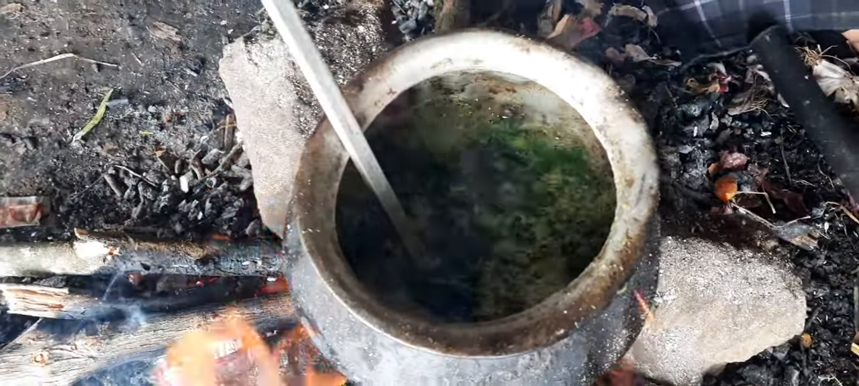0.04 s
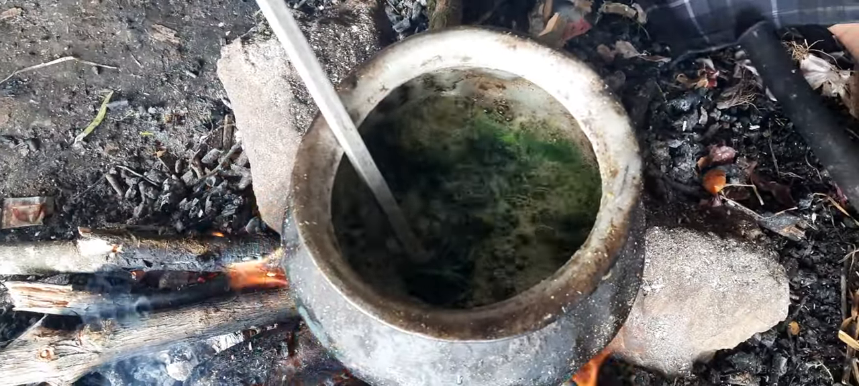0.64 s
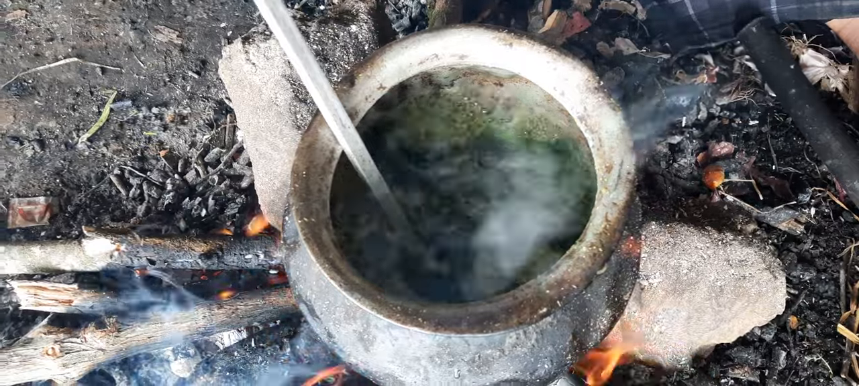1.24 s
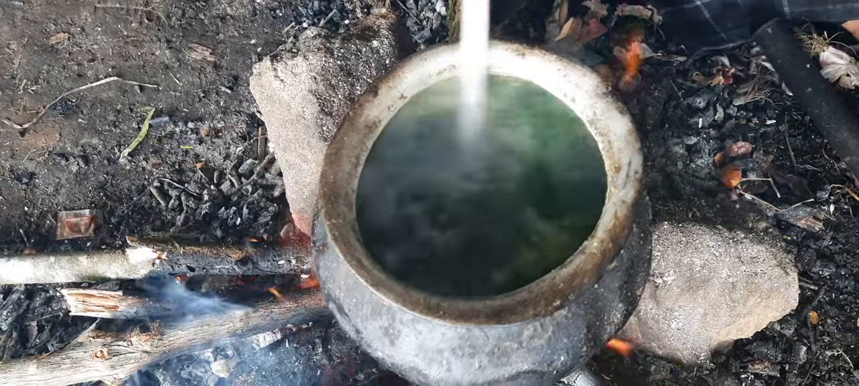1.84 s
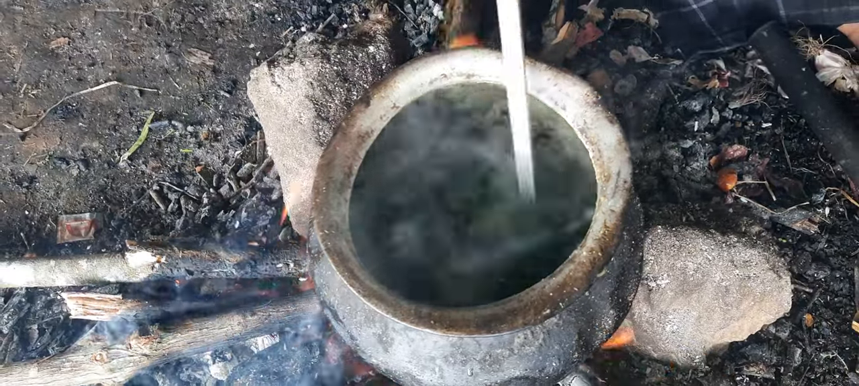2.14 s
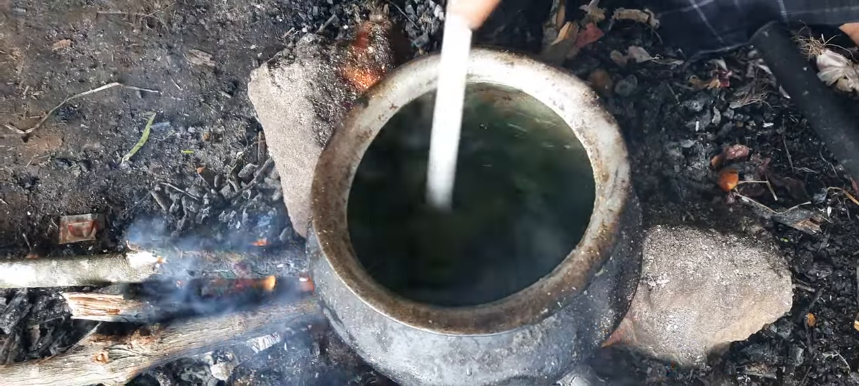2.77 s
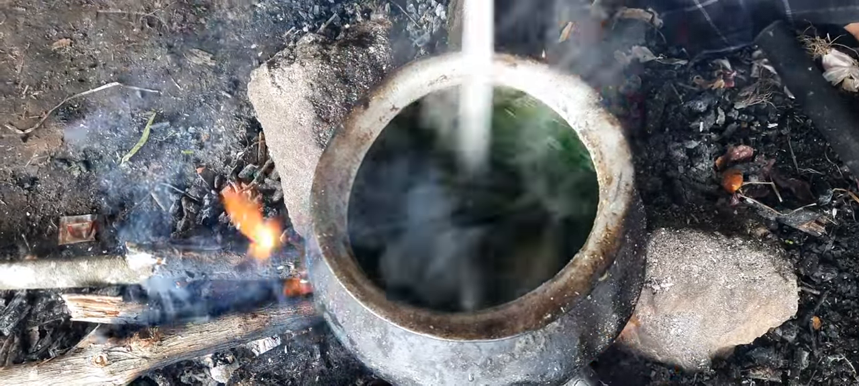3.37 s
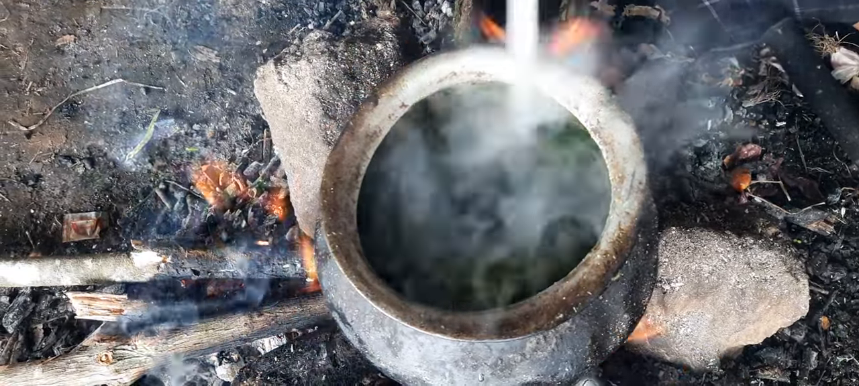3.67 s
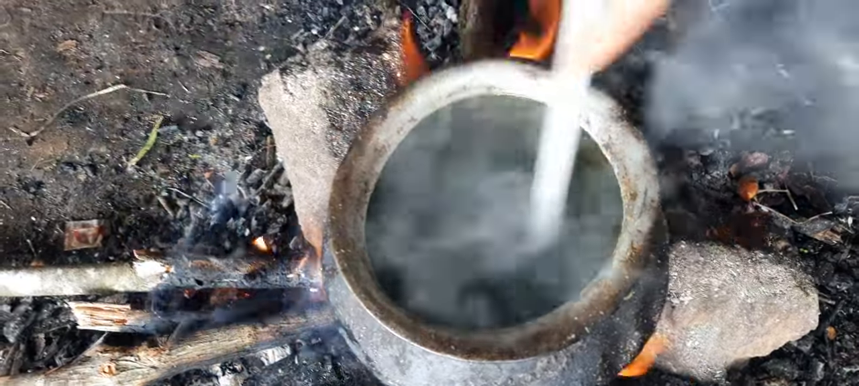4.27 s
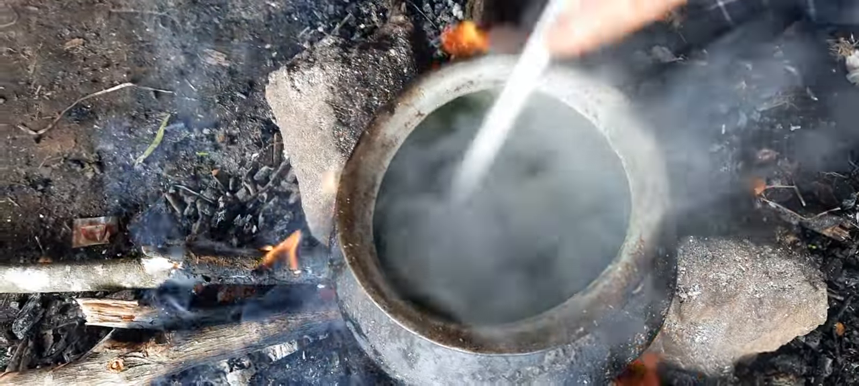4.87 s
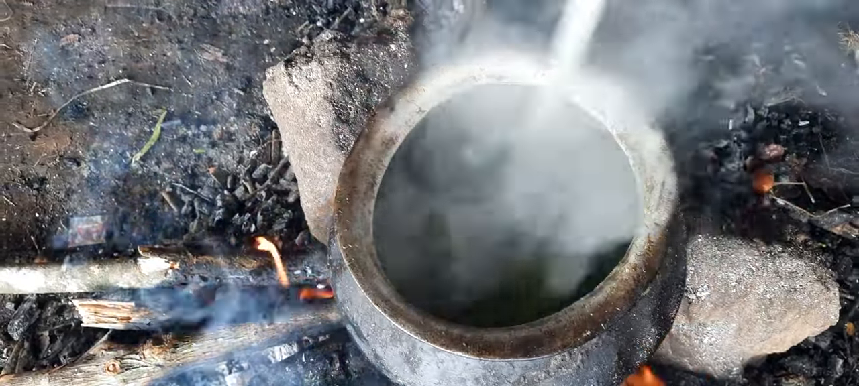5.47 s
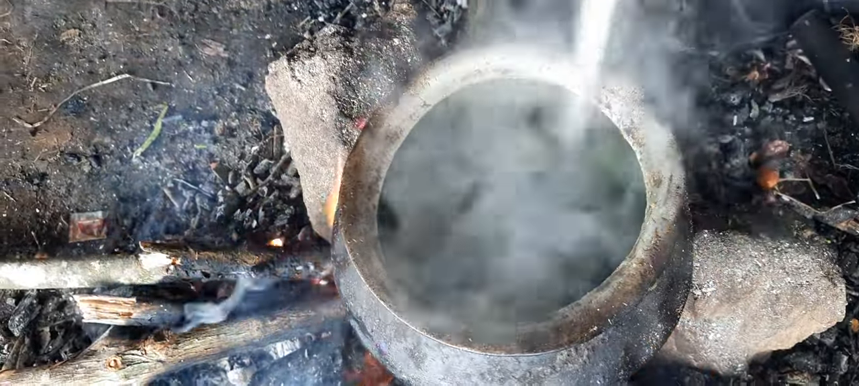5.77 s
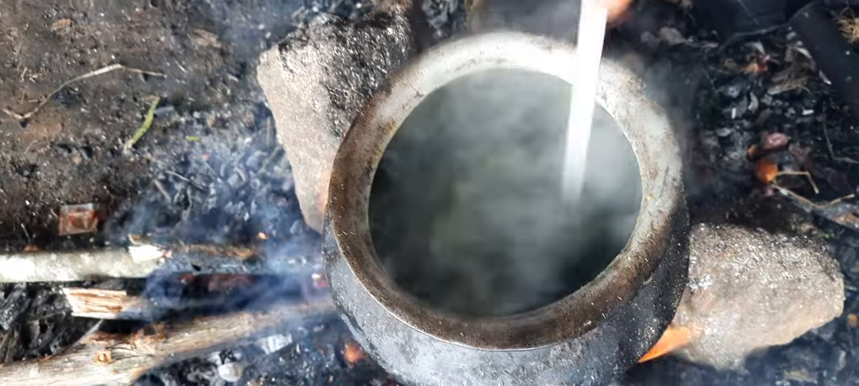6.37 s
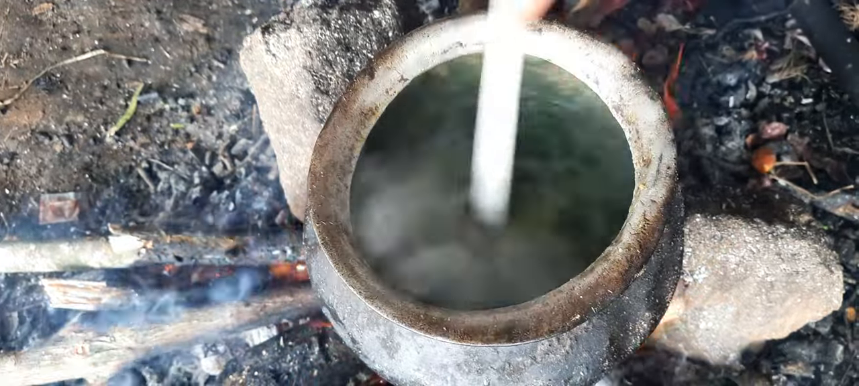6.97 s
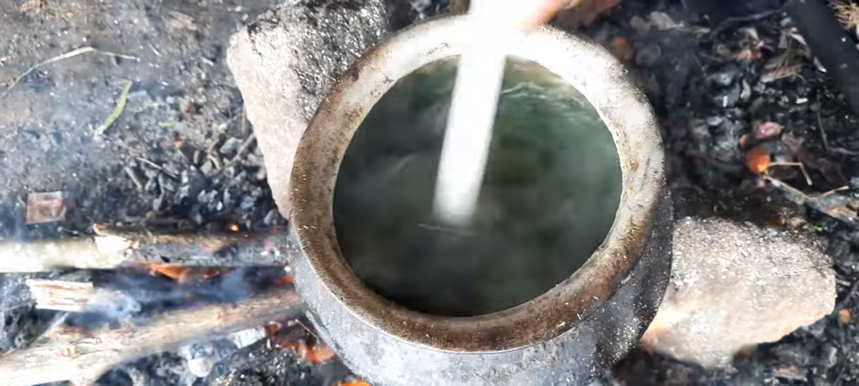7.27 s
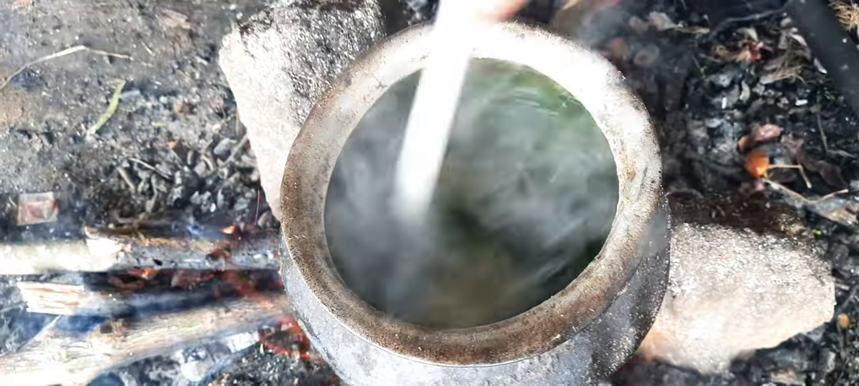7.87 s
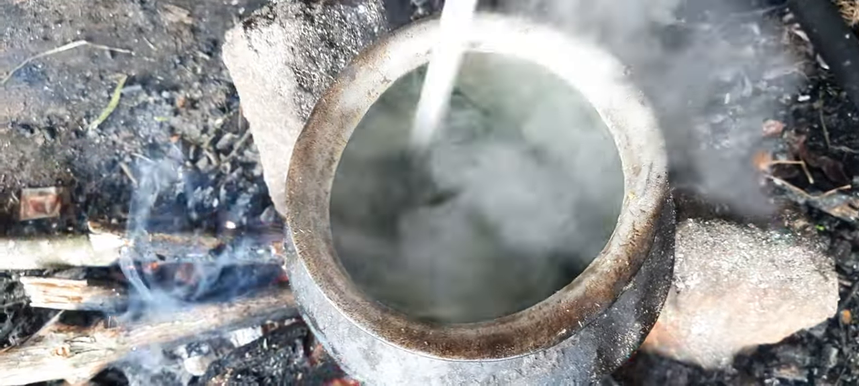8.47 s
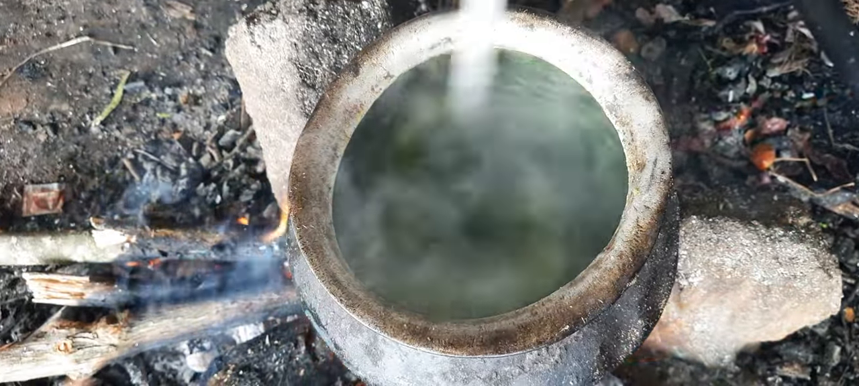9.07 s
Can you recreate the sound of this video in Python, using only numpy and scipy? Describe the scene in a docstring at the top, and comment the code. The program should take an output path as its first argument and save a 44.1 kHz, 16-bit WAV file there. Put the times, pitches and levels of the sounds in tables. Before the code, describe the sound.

After faint bubbling and fire crackle, a long ladle scrapes and knocks around a metal pot of soup, sometimes clanking the rim.

```python
"""Open air, close to a metal pot on a wood fire. Soup simmers in dull bubbles and wet sputters;
flames flutter, wood crackles, embers fizz. Then a long ladle stirs, about three sweeps a second.
Its bowl sticks and slips over the bottom, which the soup damps to a hollow knocking. Grit hisses
under it and rasps in the thin bowl, the handle clanks on the rim and the pot rocks on its stones."""
import sys
import numpy as np
from scipy import signal
from scipy.fft import rfft, irfft
from scipy.io import wavfile
from scipy.ndimage import uniform_filter1d

SR = 44100
rng = np.random.default_rng(int(sys.argv[2]) if len(sys.argv) > 2 else 0)


def log_audio(samples):
    """Write samples as a 16-bit WAV file to the path given in sys.argv[1]."""
    # one column per channel
    frames = np.atleast_2d(samples).T
    # limit to full scale, then quantise
    limited = np.clip(frames, -1, 1)
    pcm = np.round(limited * 32767).astype(np.int16)
    wavfile.write(sys.argv[1], SR, pcm)


N = 406602
T = np.arange(N) / SR
STIR_START_S, SWEEP_FALL_S = 1.721, 0.064


# soup-loaded bottom: (frequency [Hz], gain [dB])
BOTTOM_COLOUR = [(40, -73), (110, -26.5), (225, -13), (278, -21), (330, -8), (400, 1), (470, 1.5), (540, 3),
                 (740, 0), (900, -6), (1080, -3.5), (1350, -12), (2200, -32), (5000, -66)]

def bottom_knocking(pressure):
    """Small slips and hard catches ring the damped bottom. Returns sound, slip pulses, catch pulses."""
    rings, slips = patter(gap_s=0.0058, hz=510.4, log_hz_spread=0.18, t60_s=0.016, spread_db=0.5)
    judder = even(colour(rings, BOTTOM_COLOUR), span_s=0.05) * pressure * amp(-2)
    judder *= sticking(stick_s=0.0112, stuck_db=-0.5)
    knocks, catches, body = np.zeros(N), np.zeros(N), response(BOTTOM_COLOUR)
    for s, db, hz, bite_db in ladle_catches(pressure):
        blow = ring(hz, t60_s=0.024) + 1.18 * fade(t60_s=0.0025)
        add(knocks, s, signal.fftconvolve(blow, body), db + 0.56)
        add(catches, s, np.ones(1), min(bite_db + 2.5, db - 16))  # bite stays well under the knock
    return place(judder + knocks, left_db=3), slips, catches


# hardest catches: (time [s], relative level [dB], pitch [Hz], relative grit bite [dB])
HARD_CATCHES = [(1.757, -21, 510, -53), (1.865, -20.5, 544, -41), (2.212, -21, 525, -69),
                (2.262, -19.5, 510, -48), (2.51, -20, 480, -47), (2.543, -19, 535, -52),
                (2.61, -13, 593, -54), (2.629, -12, 537, -48), (2.651, -16.5, 464, -43.5),
                (2.812, -27, 447, -57), (2.952, -17, 592, -50), (2.979, -14.5, 535, -49),
                (3.006, -12.5, 510, -30), (3.067, -18, 520, -32), (3.164, -16, 460, -49),
                (3.246, -18, 456, -46), (3.472, -16, 425, -41), (3.614, -20, 430, -46.5),
                (3.695, -9.5, 585, -42), (3.768, -9.5, 555, -47), (3.882, -18.5, 502, -48),
                (4.005, -12, 486, -51), (4.081, -13, 593, -42.5), (4.114, -15, 544, -44),
                (4.161, -16.5, 460, -42), (4.17, -16, 541, -42.5), (4.36, -14, 477, -37),
                (4.421, -14, 453, -24), (4.448, -13, 417, -29), (4.497, -14, 544, -52),
                (4.554, -17, 477, -57), (4.703, -15.5, 450, -28), (4.737, -12, 480, -44),
                (4.806, -10, 573, -36), (4.852, -11, 570, -36.5), (5.063, -18.5, 501, -44.5),
                (5.138, -10.5, 570, -42), (5.16, -10.5, 667, -45), (5.268, -14.5, 530, -44),
                (5.434, -15, 465, -38), (5.492, -13, 570, -40), (5.734, -13.5, 467, -41),
                (5.762, -11.5, 540, -37.5), (5.802, -13.5, 537, -50), (5.826, -10, 520, -46),
                (5.949, -26, 443, -65), (6.069, -14, 443, -45), (6.096, -12.5, 470, -39),
                (6.156, -11, 650, -46), (6.266, -12.5, 533, -48), (6.354, -20.5, 423, -36),
                (6.392, -13, 490, -36), (6.482, -12.5, 580, -39.5), (6.492, -8, 596, -45),
                (6.546, -13.5, 557, -40.5), (6.593, -16.5, 596, -53), (6.757, -10.5, 524, -55),
                (6.826, -9.5, 637, -38.5), (6.862, -10.5, 527, -40), (7.138, -9, 553, -43),
                (7.157, -7, 540, -36), (7.195, -11.5, 560, -40), (7.411, -15.5, 500, -41.5),
                (7.477, -11.5, 480, -45), (7.512, -16, 517, -46), (7.53, -12, 420, -39.5),
                (7.795, -14, 560, -38), (7.825, -11.5, 584, -33.5), (7.858, -7, 586, -46),
                (8.012, -16.5, 545, -41), (8.102, -11, 557, -34.5), (8.172, -10.5, 536, -39),
                (8.224, -15, 530, -58), (8.347, -15, 507, -51), (8.449, -11, 620, -40),
                (8.49, -13, 546, -37), (8.57, -20.5, 523, -45), (8.585, -16, 474, -42),
                (8.626, -19, 525, -43), (8.663, -16, 415, -37.5), (8.754, -7.5, 580, -35),
                (8.781, -11.5, 494, -36), (8.883, -25, 544, -56), (9.065, -6.5, 566, -33.5),
                (9.086, -8.5, 490, -35.5), (9.122, -9, 501, -34.5)]

def ladle_catches(pressure, gap_s=0.07, over_pressure_db=8):
    """The hard catches, plus lesser ones at random whose level follows the pressure."""
    chance = rng.standard_normal((160, 4))
    times_s = STIR_START_S + np.cumsum(gap_s * np.exp(chance[:, 0] / 2))
    rows, hard_s = list(HARD_CATCHES), np.array(HARD_CATCHES)[:, 0]
    for s, (_, scatter_db, detune, grittiness) in zip(times_s, chance):
        if s < T[-1] and np.abs(hard_s - s).min() > 0.025:
            db = 20 * np.log10(pressure[int(s * SR)]) + over_pressure_db + scatter_db
            bite_db = db - 20.5 + 7 * grittiness
            rows.append((s, db, 500 * np.exp(0.12 * detune), bite_db))
    return rows


def sticking(stick_s, stuck_db):
    """Rubbing gain: the ladle sticks briefly before it jumps free at a hard catch."""
    gain = np.ones(N)
    for s, *_ in HARD_CATCHES:
        gain[int((s - stick_s) * SR):int((s + 0.004) * SR)] = amp(stuck_db)
    return uniform_filter1d(gain, size=130)


# ladle sweeps: (fastest at [s], rise [s], judder drive [dB], hiss drive [dB])
SWEEPS = [(1.81, 0.073, -27.5, -44), (2.03, 0.054, -45.5, -53), (2.27, 0.057, -31, -44.5),
          (2.631, .11, -30, -45.5), (3.06, 0.13, -25.5, -41.5), (3.47, 0.11, -30.5, -46.5),
          (3.73, 0.094, -27.5, -43.5), (4.07, .08, -28, -44.5), (4.44, 0.12, -26, -43),
          (4.79, 0.064, -22, -41.5), (5.15, 0.081, -23.5, -43), (5.52, 0.11, -22, -42.5),
          (5.83, 0.087, -21.5, -42.5), (6.132, 0.057, -22.5, -45), (6.49, 0.13, -22.5, -47),
          (6.829, .07, -22.5, -44), (7.182, 0.084, -18.5, -42), (7.5, 0.14, -26, -52),
          (7.849, 0.11, -20, -45), (8.11, 0.064, -20.5, -43.5), (8.47, 0.1, -24, -47),
          (8.78, 0.082, -23.5, -42), (9.09, 0.07, -23, -58)]
# hand turns, ladle lifts: (landing [s], time off the bottom [s], lull floor [dB], skid drive [dB])
LIFTS = [(2.208, .14, -45, -65), (2.34, 0.04, -18, -64), (2.796, 0.091, -23, -73), (3.333, 0.035, -15, -72),
         (3.879, .08, -23, -54), (4.548, 0.038, -16, -43), (5.263, 0.027, -4, -41),
         (5.948, 0.099, -18, -64), (6.265, .055, -15, -45), (6.592, 0.033, -12, -47),
         (7.318, 0.055, -17, -70), (7.94, 0.048, -8.5, -52), (8.219, 0.045, -10, -44),
         (8.571, 0.074, -20, -65), (8.884, 0.09, -23, -63)]
# bowl dragging, louder and higher overall with time: (time [s], rasp drive [dB], base pitch [Hz])
BOWL_DRAG = [(1.72, -61, 1750), (2.4, -77, 1770), (2.9, -53, 1610), (4.2, -48.5, 1870), (4.7, -44.5, 2300),
             (5.35, -46.5, 2200), (5.9, -40.5, 2080), (6.7, -45.5, 2120), (7.3, -41, 2315),
             (9.22, -44, 2220)]

def stirring(drag_judder_db=-30, drag_hiss_db=-49, gentle_db=-9, bear_down_s=1.3, lift_db_per_s=440):
    """Drives of judder, hiss and rasp: a drag that swells at sweeps, fades at lifts, skids on landing."""
    contact, skid = 1.0 * (T > STIR_START_S), np.zeros(N)
    for lands_s, off_s, lull_db, skid_db in LIFTS:
        lifted = (T > lands_s - off_s) & (T < lands_s)
        contact[lifted] = amp(np.maximum(-lift_db_per_s * (T[lifted] - lands_s + off_s), lull_db))
        add(skid, lands_s, fade(t60_s=0.13, size=16000), skid_db)
    contact = uniform_filter1d(contact, size=130)
    rubbing = uniform_filter1d(contact, size=700)  # hiss builds more slowly
    # the hand starts gently, then bears down
    effort = amp(gentle_db * np.exp(-np.maximum(T - STIR_START_S, 0) / bear_down_s))
    sweep_judder, sweep_hiss = np.zeros(N), np.zeros(N)
    for s, rise_s, judder_db, hiss_db in SWEEPS:
        speed = swell(s, rise_s, SWEEP_FALL_S)
        sweep_judder += amp(judder_db) * speed
        sweep_hiss += amp(hiss_db) * speed
    grip = amp(1.7 * walk(rate_hz=16))
    drag_s, drag_db, _ = np.transpose(BOWL_DRAG)
    bowl_drag = np.interp(T, drag_s, amp(drag_db), left=0, right=0)
    pressure = contact * np.hypot(sweep_judder, amp(drag_judder_db) * effort)
    hiss = rubbing * np.hypot(sweep_hiss, effort * (amp(drag_hiss_db) * grip + skid))
    rasping = contact * np.hypot(amp(-6) * sweep_hiss, bowl_drag * grip)
    return pressure, hiss, rasping


# ladle's thin bowl: (frequency [Hz], gain [dB])
BOWL_COLOUR = [(600, -16), (1350, -3.5), (1800, 2.5), (2350, -2), (2900, 5.5), (3400, -6.5), (6000, -14)]

def bowl_rasp(level, spurts, catches, sag=0.17, wander=0.068):
    """Coarse grains ring the wet bowl's close modes, lower when deep in a sweep; catches click on it."""
    drag_s, _, base_hz = np.transpose(BOWL_DRAG)
    digging = sum(swell(s, rise_s, SWEEP_FALL_S) for s, rise_s, *_ in SWEEPS)
    hz = np.interp(T, drag_s, base_hz) * np.exp(wander * walk(rate_hz=10) - sag * (digging - 0.5))
    shared, apart = (
        patter(gap_s=0.0026, hz=hz, log_hz_spread=0.13, t60_s=0.0078, spread_db=3, count=3600, size=400)[0]
        for _ in range(2))
    sides = []
    for grains in shared + 0.2 * apart, shared - 0.15 * apart:
        modes = rng.standard_normal(2048) * fade(t60_s=0.045)
        ringing = unit(grains) + amp(-0.5) * unit(excite(grains, modes))
        sides.append(even(colour(moving_contact(ringing, patchy_db=4), BOWL_COLOUR), span_s=0.045))
    click = colour(rng.standard_normal(2048) * fade(t60_s=0.03), BOWL_COLOUR)
    clicks = moving_contact(excite(catches, click / np.abs(click).max()), patchy_db=2.5)
    return np.array(sides) * level * (amp(-9) + amp(-4.5) * spurts) + amp(2.5) * clicks


# scrape at each side: (frequency [Hz], relative gain [dB])
SCRAPE_LEFT_COLOUR = [(300, -21.5), (1000, -3), (1350, -8.5), (1900, -6), (2900, -19.5), (3700, -9.5),
                      (5100, -11), (6600, -10.5), (7600, -6), (8800, -18), (10000, -32), (12200, -22.5),
                      (15500, -25)]
SCRAPE_RIGHT_COLOUR = [(300, -3), (1000, 1.5), (1350, 6.5), (1800, 5), (2350, -1), (2700, 3.5), (3300, 5),
                       (5500, 0.5), (7200, -3.5), (8600, -10.5), (10300, -2), (12000, 0), (15500, -18)]

def grit_scrape(hiss, spurts, catches):
    """Metal drags over grit, spurting at slips and biting at catches; part rings in the dry wall."""
    wall = wall_ring()
    drive = hiss * (amp(-4.5) + amp(-6) * spurts) * sticking(stick_s=0.0031, stuck_db=-5.5)
    drive += amp(-4.5) * excite(catches, fade(t60_s=0.025))
    shared = grit(spread_db=1.5)
    sides = []
    for points in SCRAPE_LEFT_COLOUR, SCRAPE_RIGHT_COLOUR:
        grains = 0.45 * shared + 0.85 * grit(spread_db=3.5)
        scraping = moving_contact(drive * grains, patchy_db=3.2)
        sides.append(colour(scraping, points) / np.linalg.norm(response(points)))
    singing = np.array([excite(drive * shared, side) for side in wall]) / np.linalg.norm(wall[0])
    return np.array(sides) + amp(-8) * singing


def moving_contact(x, patchy_db, size=512):
    """The contact point crosses the wall's nodes, so narrow resonances come and go."""
    frames = signal.stft(x, nperseg=size)[2]
    swing = uniform_filter1d(rng.standard_normal(frames.shape), size=3, axis=0)
    swing = uniform_filter1d(swing, size=8, axis=1)
    return signal.istft(frames * amp(patchy_db * unit(swing)), nperseg=size)[1][:N]


# handle strikes on the rim: (time [s], relative level [dB], brightest pitch [Hz])
HANDLE_STRIKES = [(1.8247, -24.5, 1550), (1.8375, -26, 2240), (1.8659, -28.5, 2150), (2.1736, -47.5, 1500),
                  (3.0204, -22, 1500), (3.034, -21.5, 1490), (3.053, -21.5, 1560), (3.0687, -22.5, 1820),
                  (3.0919, -22, 1000), (3.0958, -21.5, 905), (4.4324, -18, 2840), (4.4473, -22, 1496),
                  (6.831, -29.5, 890), (6.84, -25.5, 1530)]
# handle-rim contact: (frequency [Hz], gain [dB])
CONTACT_COLOUR = [(400, -21), (900, -2), (1500, 9.5), (2300, 11), (3300, 8), (4400, -4.5), (5700, 2.5),
                  (6700, -11.5), (7800, -3), (9000, -30), (15000, -66)]

def handle_clanks():
    """The handle chatters on the rim: sharp crack, rough slide, brief shaft ring, wall modes."""
    out = np.zeros((2, N))
    for s, db, hz in HANDLE_STRIKES:
        shared, *sides = rng.standard_normal((3, 2048))
        crack = [colour((shared + 0.6 * own) * fade(t60_s=0.018), CONTACT_COLOUR) for own in sides]
        slide = [colour(own * fade(t60_s=0.57), CONTACT_COLOUR) for own in sides]
        shaft = signal.fftconvolve(shared * fade(t60_s=0.035), ring(hz, t60_s=0.062))
        add(out, s, place(np.array(crack), left_db=2.5), db + 4)
        add(out, s, np.array(slide), db - 11)
        add(out, s, shaft, db - 7.5)
        add(out, s, wall_ring(hz, reach_oct=0.44, uneven_db=1.5), db + 1)
    return out


# dry upper wall and rim: (frequency [Hz], relative level [dB], t60 [s], left minus right [dB])
WALL_MODES = [(951, 1, 0.24, -13), (1235, -5, 0.1, 25), (1506, 3, 0.2, 14), (1560, 2, 0.39, 0),
              (1802, -1, 0.22, 16), (2070, -32, 0.091, 5), (2080, 8, 0.19, 0), (2200, 1, 0.18, 22),
              (2540, -10, 0.2, 15), (2540, 8.5, 0.16, -1), (2610, -15, 0.1, 13), (3300, 0, 0.13, 3),
              (3550, 5.5, 0.11, 18), (4290, 4.5, 0.15, 14), (5640, -4, 0.21, 27), (7600, 8, 0.031, 18)]

def wall_ring(hz=2500, reach_oct=9, uneven_db=0, size=12000):
    """A blow favours the wall modes near its pitch and, by where it lands, some more than others."""
    out = np.zeros((2, size))
    for mode_hz, db, t60_s, left_db in WALL_MODES:
        strength, phases = rng.standard_normal(), rng.standard_normal((2, 1))
        gain = amp(db + uneven_db * strength) / (1 + (np.log2(mode_hz / hz) / reach_oct) ** 2)
        swing = np.sin(2 * np.pi * mode_hz * T[:size] + phases)
        out += place(gain * swing * fade(t60_s, size), left_db)
    return out


# pot landings: (time [s], relative level [dB])
POT_LANDINGS = [(1.923, -20), (3.1269, -11), (3.135, -20), (6.949, -9.5), (6.955, -19.5)]
# rocking pot: (frequency [Hz], gain [dB])
POT_COLOUR = [(30, -41), (80, -11.5), (160, -8), (220, 2), (280, -4.5), (400, 6), (540, 5), (800, -10.5),
              (1400, -30.5), (4000, -91)]

def pot_thuds():
    """The full pot tips and lands on a hearth stone."""
    out = np.zeros(N)
    for s, db in POT_LANDINGS:
        add(out, s, response(POT_COLOUR), db + 7.5)
        add(out, s, ring(hz=222.3, t60_s=0.11, size=6000), db - 17)
    return place(out, left_db=3.5)


# big bubbles: (time [s], relative sputter level [dB], churn level [dB])
BIG_BUBBLES = [(.089, -50.5, -45), (.142, -47, -45), (.226, -55, -46), (.329, -59, -46), (.385, -54, -48),
               (.544, -53, -48), (.633, -48.5, -49.5), (.761, -56, -48.5), (.905, -51.5, -47),
               (1.103, -68, -50), (1.2, -66, -46.5), (1.449, -53, -44), (1.529, -61, -48),
               (1.65, -50.5, -45)]
# collapsing bubble skin: (frequency [Hz], gain [dB])
SPUTTER_COLOUR = [(500, -5), (1000, 6), (1500, 6), (2100, -8), (2900, -7), (3800, -16), (5000, -26),
                  (9000, -26)]

def sputters():
    """A big bubble opens and its skin collapses in a short wet rustle."""
    out = np.zeros((2, N))
    for s, db, _ in BIG_BUBBLES:
        shared, *sides = rng.standard_normal((3, 2048)) * fade(t60_s=0.042) * (1 - fade(t60_s=0.0089))
        add(out, s, np.array([colour(shared + own, SPUTTER_COLOUR) for own in sides]), db + 3.5)
    return out


# bubbles in the pot's hollow: (frequency [Hz], gain [dB])
BUBBLE_COLOUR = [(80, -16), (200, -5.5), (290, -10), (400, 1.5), (560, -1.5), (750, -4.5), (1000, -11),
                 (1450, -8.5), (2200, -46), (3600, -22), (5000, -46), (8000, -43)]

def simmer(opening_db=-50, later_db=-62):
    """Small bubbles burst with wet ticks, louder near big ones; the level drops abruptly at 1.72 s."""
    rings, bursts = patter(gap_s=0.0046, hz=484, log_hz_spread=0.24, t60_s=0.017, spread_db=4)
    ticks = excite(bursts, fade(t60_s=0.015)) * rng.standard_normal(N)
    churn_power = sum((amp(db) * swell(s, rise_s=0.039, fall_s=0.053)) ** 2 for s, _, db in BIG_BUBBLES)
    level = np.hypot(np.sqrt(churn_power), amp(np.where(T < STIR_START_S, opening_db, later_db)))
    soup = even(colour(rings + amp(-6.5) * ticks, BUBBLE_COLOUR), span_s=0.1) * level
    add(soup, s=0.006, sound=ring(hz=2700, t60_s=0.019), db=-50)  # one tiny bubble pings
    return place(soup, left_db=2.5)


# foam: (frequency [Hz], relative gain [dB])
FOAM_COLOUR = [(900, -17), (1800, 1), (2800, 2), (3800, 0), (5000, -19), (9000, -18)]

def foam():
    """Foam rustles on the churning soup around each big bubble."""
    level = sum(amp(db - 22.5) * swell(s, rise_s=0.026, fall_s=0.037) for s, db, _ in BIG_BUBBLES)
    rustles = (moving_contact(grit(spread_db=4), patchy_db=3.5) for _ in range(2))  # colour flickers
    return level * np.array([unit(colour(side, FOAM_COLOUR)) for side in rustles])


# flares under the pot: (time [s], rise and fall [s], relative level [dB])
FLARES = [(.114, 0.031, -46), (.24, 0.072, -52), (.59, 0.057, -50.5), (.81, 0.072, -48.5),
          (1.12, 0.055, -46), (1.37, 0.04, -49.5), (1.57, 0.069, -60), (5.11, 0.055, -58), (6.4, .11, -64)]
# flames: (frequency [Hz], relative gain [dB])
FLAME_COLOUR = [(20, -5), (45, 1), (70, 7.5), (110, 5), (170, -10), (300, -12), (900, -70)]

def flames():
    """Flames flare with a low flutter, mostly to the left."""
    level = sum(amp(db) * swell(s, width_s, width_s) for s, width_s, db in FLARES) + amp(-72)
    flutter, draught = (even(colour(rng.standard_normal(N), FLAME_COLOUR), span_s=0.02) for _ in range(2))
    return level * np.array([amp(10.5) * flutter, amp(-4) * flutter + amp(-12) * draught])


# sharp ticks, the last from the ladle: (time [s], relative level [dB])
SHARP_TICKS = [(0.1304, -52), (0.2064, -61), (0.371, -54), (0.6135, -52), (0.8394, -40), (0.8574, -47),
               (1.2311, -44), (1.273, -47), (1.3833, -39), (6.567, -35), (7.538, -26)]
# one tick: (frequency [Hz], gain [dB])
TICK_COLOUR = [(500, -17), (2000, -2), (5000, -1), (7600, 12), (9500, -4), (12000, 3), (15500, -17)]

def sharp_ticks():
    """Wood snaps, and one bright ladle tick late in the stirring: each a burst with a weaker tail."""
    out = np.zeros((2, N))
    for s, db in SHARP_TICKS:
        burst = rng.standard_normal((2, 2048)) * (fade(t60_s=0.0043) + amp(-7) * fade(t60_s=0.058))
        add(out, s, np.array([colour(side, TICK_COLOUR) for side in burst]), db + 1.5)
    return out


# ember fizz: (frequency [Hz], relative gain [dB])
EMBER_COLOUR = [(30, -10), (100, 5), (400, 8.5), (900, -8), (2000, -16), (3500, -22), (5000, -26),
                (7500, -14.5), (9500, -33), (12000, -22), (15500, -39)]

def embers(fizz_db=-61, hiss_db=-60):
    """Embers fizz faintly; a short hiss follows each sharp tick."""
    hisses = np.minimum(sum(swell(s, rise_s=0.008, fall_s=0.058) for s, _ in SHARP_TICKS), 1)
    level = amp(fizz_db + 6 * walk(rate_hz=20)) + amp(hiss_db) * hisses
    return level * np.array([unit(colour(grit(spread_db=3), EMBER_COLOUR)) for _ in range(2)])


def ground_scatter(x, size=9000):
    """Stones and ground add a faint, short tail."""
    tail = rng.standard_normal((2, size)) * fade(t60_s=0.11, size=size) * (T[:size] > 0.004)
    return x + amp(-17) * signal.oaconvolve(x, tail / np.linalg.norm(tail[0]), axes=1)[:, :N]


def patter(gap_s, hz, log_hz_spread, t60_s, spread_db, count=2000, size=1024):
    """Uneven run of damped rings around a fixed or moving pitch. Returns rings and onset pulses."""
    rings, pulses, centre_hz = np.zeros(N), np.zeros(N), hz * np.ones(N)
    chance = rng.standard_normal((count, 4))
    times_s = np.cumsum(gap_s * np.exp(chance[:, 0] / 2))
    for s, (_, strength, detune, length) in zip(times_s, chance):
        if s < T[-1]:
            start = int(s * SR)
            ring_hz = centre_hz[start] * np.exp(log_hz_spread * detune)
            add(rings, s, ring(ring_hz, t60_s * np.exp(0.3 * length), size), spread_db * strength)
            pulses[start] = amp(spread_db * strength)
    return rings, pulses


def grit(spread_db):
    """Dense tiny clicks of unequal size."""
    noise = rng.standard_normal(N)
    grain_db = spread_db * np.repeat(rng.standard_normal(N // 16 + 1), 16)[:N]
    return unit(noise * amp(grain_db))


def ring(hz, t60_s, size=2048):
    """One struck mode."""
    return np.sin(2 * np.pi * hz * T[:size]) * fade(t60_s, size)


def fade(t60_s, size=2048):
    """Exponential decay."""
    return np.exp(-np.log(1000) * T[:size] / t60_s)


def swell(s, rise_s, fall_s):
    """Smooth hump of height 1 at time s."""
    return np.exp(-np.minimum(((T - s) / np.where(T < s, rise_s, fall_s)) ** 2, 60))


def walk(rate_hz):
    """Slewed random levels, rms 1."""
    hold = int(SR / rate_hz)
    steps = np.repeat(rng.standard_normal(N // hold + 1), hold)[:N]
    return unit(uniform_filter1d(steps, hold))


def response(points, size=2048):
    """Minimum-phase impulse response of a (Hz, dB) colour."""
    hz, db = np.transpose(points)
    bin_db = np.interp(np.log(np.fft.rfftfreq(size, 1 / SR) + 1), np.log(hz), db)
    cepstrum = irfft(np.log(amp(bin_db)))[:size // 2]
    cepstrum[1:] *= 2
    return irfft(np.exp(rfft(cepstrum, size)))


def excite(x, impulse_response):
    """Convolve, keeping the length of x."""
    return signal.oaconvolve(x, impulse_response)[:len(x)]


def colour(x, points):
    """Filter by a (Hz, dB) colour."""
    return excite(x, response(points))


def even(x, span_s):
    """Flatten a texture's slow swells."""
    power = np.abs(uniform_filter1d(x ** 2, int(span_s * SR)))
    return x / np.sqrt(power + 1e-4 * np.mean(x ** 2))


def add(track, s, sound, db):
    """Mix in a sound at time s and peak level db."""
    start = int(np.clip(s * SR, 0, N - 1))
    track[..., start:start + sound.shape[-1]] += amp(db) * sound[..., :N - start] / np.abs(sound).max()


def place(x, left_db):
    """Pan by a left-minus-right level."""
    return x * amp(np.array([[left_db], [-left_db]]) / 2)


def amp(db):
    """Decibels to gain."""
    return 10 ** (np.asarray(db) / 20)


def unit(x):
    """Scale to rms 1."""
    return x / np.sqrt(np.mean(x ** 2))


def scene():
    """Stirring drives the knocking, scrape and rasp, over the soup and the fire."""
    pressure, hiss, rasping = stirring()
    knocking, slips, catches = bottom_knocking(pressure)
    spurts = even(excite(slips, fade(t60_s=0.065)), span_s=0.15)
    ladle = knocking + grit_scrape(hiss, spurts, catches) + bowl_rasp(rasping, spurts, catches)
    pot = ground_scatter(ladle + handle_clanks() + pot_thuds())
    soup = simmer() + foam() + sputters()
    return pot + soup + flames() + sharp_ticks() + embers()


def record(dry):
    """A steep low-pass cuts the top of the treble."""
    top_hz = 15800
    return signal.sosfilt(signal.ellip(10, 0.2, 80, top_hz, fs=SR, output="sos"), dry)


dry = scene()
out = record(dry)
log_audio(out)
```